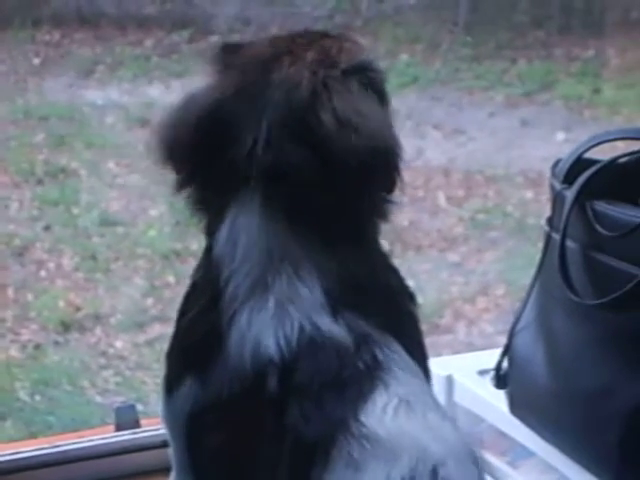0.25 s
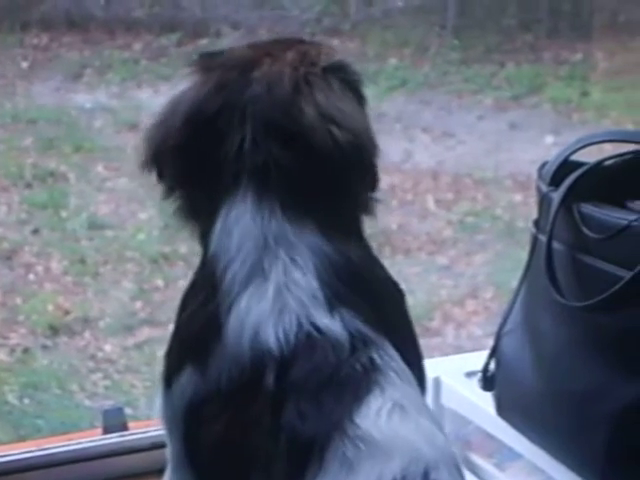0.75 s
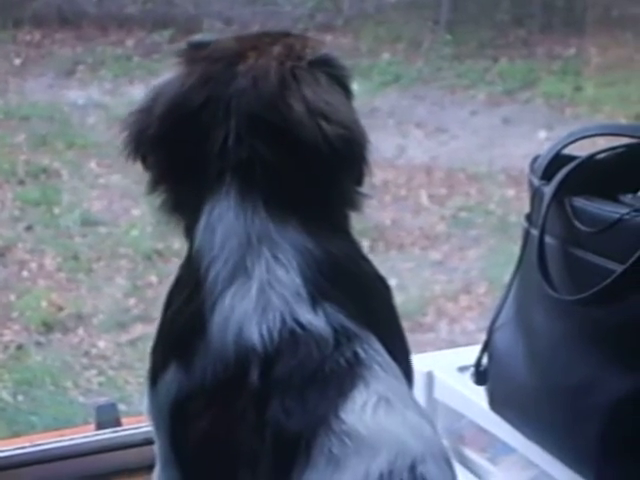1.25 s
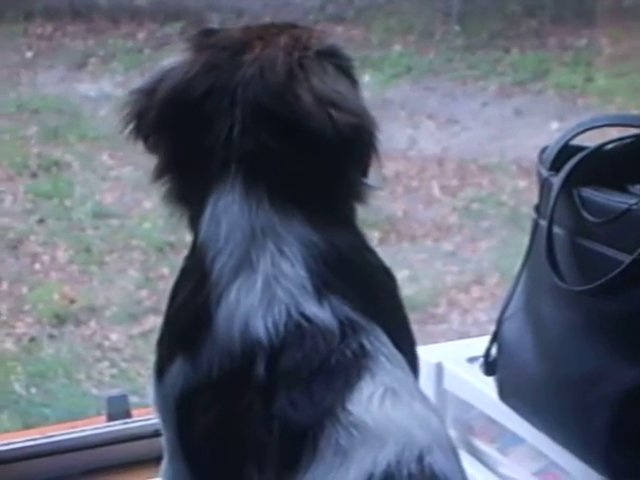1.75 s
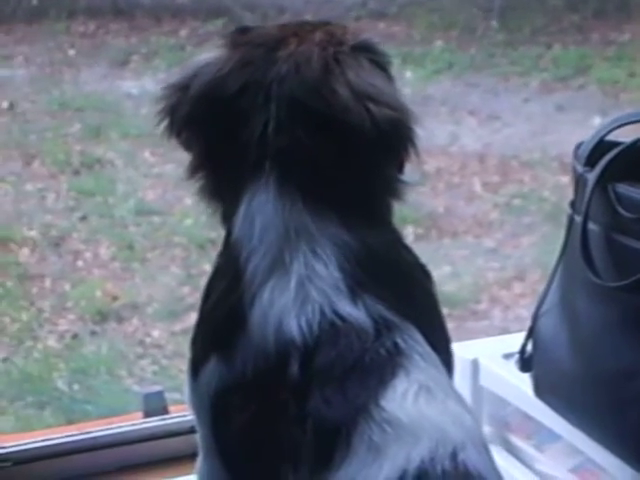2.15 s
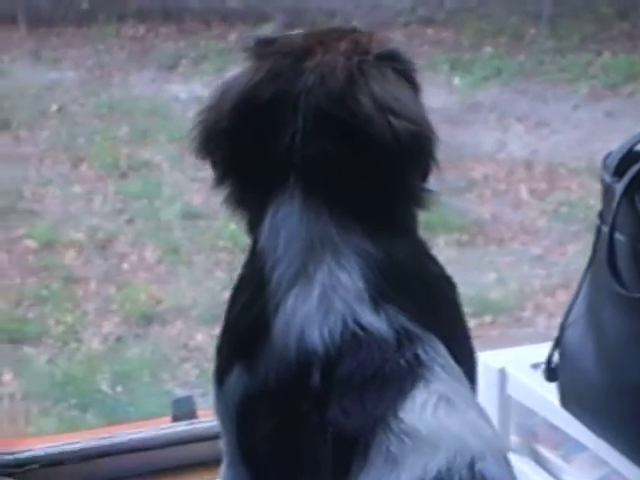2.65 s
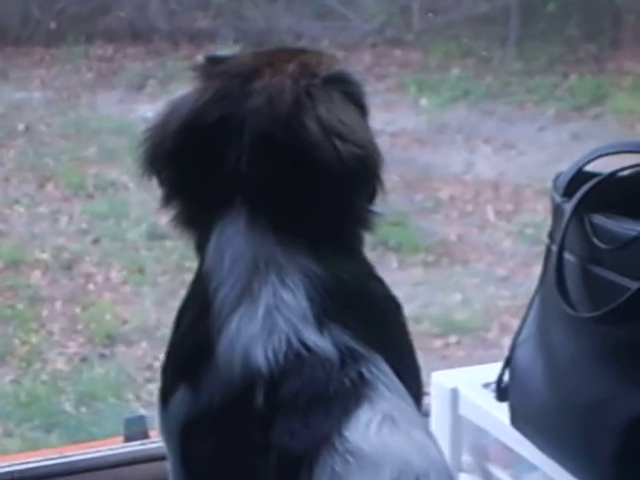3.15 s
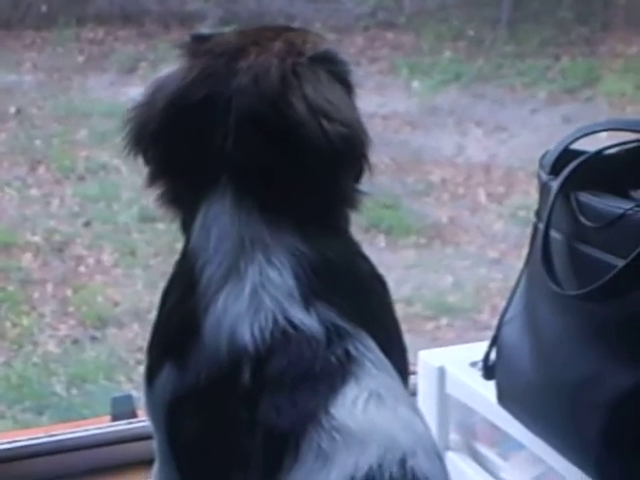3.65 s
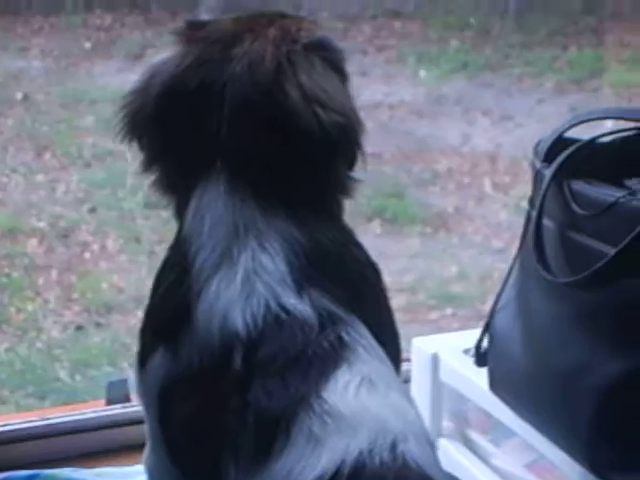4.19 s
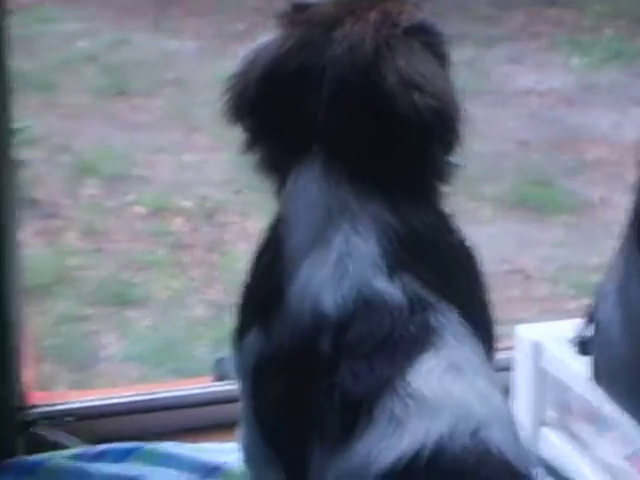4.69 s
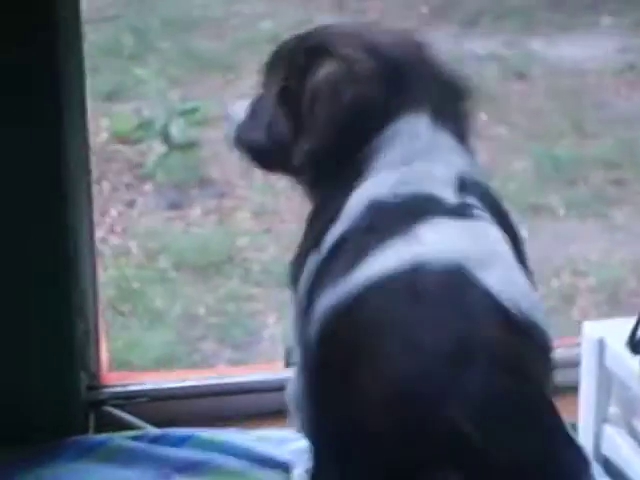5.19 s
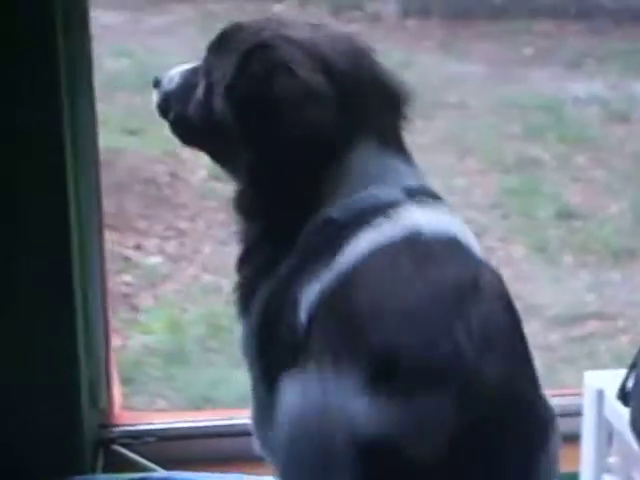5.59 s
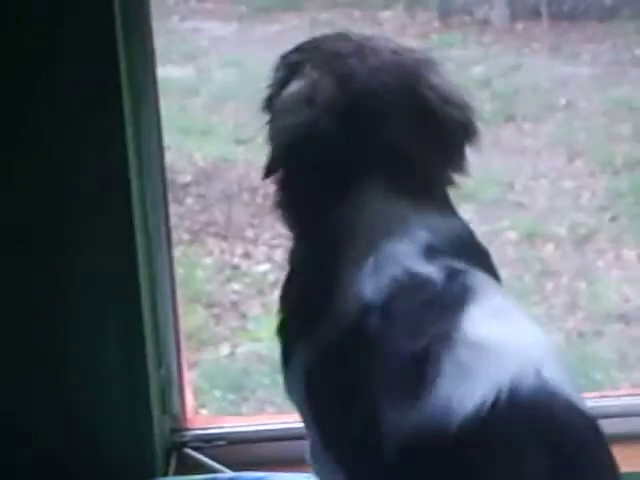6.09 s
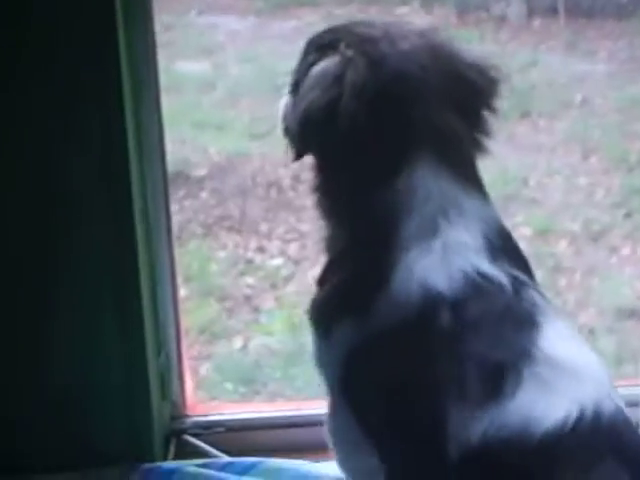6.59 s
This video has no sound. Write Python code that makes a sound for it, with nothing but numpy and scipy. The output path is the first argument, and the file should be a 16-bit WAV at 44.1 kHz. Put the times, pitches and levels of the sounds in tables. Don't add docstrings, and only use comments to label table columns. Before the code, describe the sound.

Close to a camera microphone in a small furnished room, a young dog huffs and gives one loud, high, rough bark. Quiet sniffs, lip smacks and claw ticks follow, with a soft growl ending in a huff. After more quiet, a low fluttering growl swells into a second, lower and clearer bark that decays into a growl, then short huffs. Soft hiss and distant traffic lie underneath.

```python
import sys
import numpy as np
from scipy import signal
from scipy.fft import rfft, irfft
from scipy.io import wavfile

SR = 44100
rng = np.random.default_rng(int(sys.argv[2]) if len(sys.argv) > 2 else 0)


def amplitude_ratio(level_db):
    exponent = np.asarray(level_db, float) / 20
    return 10 ** exponent


def store_wav(level_fs):
    pcm = np.round(np.clip(np.atleast_2d(level_fs), -1, 1) * 32767)
    wavfile.write(sys.argv[1], SR, pcm.T.astype(np.int16))


N = 301400
CONTROL = np.arange(0, N / SR, .002)
CEILING = .72


def evened(x):
    return x / np.sqrt(np.mean(x ** 2) + 1e-20)


def read(points, hz):
    f, value = np.transpose(points)
    return np.interp(np.log(hz + 1), np.log(f + 1), value)


def add(mix, s, sound):
    part = mix[round(s * SR):][:len(sound)]
    part += sound[:len(part)]


def spread(rows):
    s, *columns = np.transpose(rows)
    t = np.arange(s[0], s[-1], 1 / SR)
    return t, [np.interp(t, s, c) for c in columns]


def slow(values):
    return np.interp(np.arange(N) / SR, CONTROL, values)


def peak(t, s, db, rise_db_s, fall_db_s):
    return db - np.where(t < s, rise_db_s * (s - t), fall_db_s * (t - s))


def drift(count, hz):
    noise = rng.standard_normal(count + 4000)
    return evened(signal.lfilter(*signal.butter(2, hz, fs=SR), noise)[4000:])


def coloured(points):
    z = rfft(rng.standard_normal(N))
    return evened(irfft(z * amplitude_ratio(read(points, np.fft.rfftfreq(N, 1 / SR))), N))


def resonate(x, hz, width):
    turn = np.exp(2j * np.pi * np.cumsum(hz * np.ones(len(x))) / SR)
    r = np.exp(-np.pi * 1.5 * width / SR)
    return 2 * (turn * signal.lfilter([(1 - r) ** 2], [1, -2 * r, r * r], x / turn)).real


def tract(drive, modes, jaw=1, wander=0):
    out = np.zeros(len(drive))
    for k, (hz, width, db) in enumerate(modes):
        moving_hz = hz * jaw * (1 + wander * drift(len(drive), 40))
        out += (-1) ** k * amplitude_ratio(db) * resonate(drive, moving_hz, width)
    return evened(out)


def whistle(start, end, from_hz, to_hz, db, waver=.017, throb_db=2.5):
    count = round((end - start) * SR)
    hz = np.linspace(from_hz, to_hz, count) * (1 + waver * drift(count, 200))
    tone = np.sqrt(2) * np.sin(2 * np.pi * (np.cumsum(hz) / SR + rng.random()))
    return start, tone * amplitude_ratio(db + throb_db * drift(count, 70)) * signal.windows.tukey(count, .3)


def call(t, hz, low, high, jaw, voice_db, upper_dbs, throat, clean_db=-90, burst_db=3, throb_db=7):
    low, high = np.clip(low, 0, 1), np.clip(high, 0, 1)
    turns = np.cumsum(hz * (1 + .12 * low * drift(len(t), 150))) / SR
    folds = evened(sum(np.cos(2 * np.pi * k * turns) for k in range(1, 16)))
    folds = folds * amplitude_ratio(4 * low * np.cos(np.pi * turns))
    puffs = evened((0.69 + np.exp(-(turns % 1) / 0.35)) * rng.standard_normal(len(t)))
    low_drive = np.sqrt(1 - low) * folds + np.sqrt(low) * puffs
    high_drive = np.sqrt(1 - high) * folds + np.sqrt(high) * puffs
    out = amplitude_ratio(voice_db + throb_db * low * drift(len(t), 97)) * tract(low_drive, throat[0], jaw, wander=.03)
    out += amplitude_ratio(clean_db) * (1 - low) ** 4 * np.sqrt(2) * np.cos(2 * np.pi * turns)
    for db, modes in zip(upper_dbs, throat[1:]):
        gusts = amplitude_ratio(burst_db * drift(len(t), 80))
        out += amplitude_ratio(db) * gusts * tract(high_drive, modes, wander=.018)
    return t[0], out * signal.windows.tukey(len(t), .04)


def background():
    # frequency in Hz, level in dB per Hz.
    hiss = [(15, -31.5), (25, 0.5), (59, 3), (150, -2.5), (373, -13.5), (573, -14), (655, -14.5),
            (3260, -21.5), (6900, -26.5), (7480, -24), (8100, -30), (10000, -24.5), (12400, -52),
            (15000, -52)]
    # time in seconds, level in dB.
    surges = [(1.0, -60.5), (1.3, -59), (1.6, -58), (2.0, -56.5), (2.6, -66), (3.1, -64)]
    # frequency in Hz, rms level in dB.
    whines = [(7418, -83)]
    t = np.arange(N) / SR
    engine = amplitude_ratio(-71.5) + sum(amplitude_ratio(peak(CONTROL, s, db, 73, 73)) for s, db in surges)
    tyres = amplitude_ratio(-78) + amplitude_ratio(peak(t, 1.6, -65, rise_db_s=5, fall_db_s=11.5))
    drone = evened(resonate(rng.standard_normal(N), 71, 12)) * slow(engine) * amplitude_ratio(-5.0)
    roll = evened(resonate(rng.standard_normal(N), 150, 42)) * tyres
    whine = sum(amplitude_ratio(db) * np.sqrt(2) * np.sin(2 * np.pi * hz * t) for hz, db in whines)
    return amplitude_ratio(-67 + 0.82 * drift(N, 1.9)) * coloured(hiss) + drone + roll + whine


def huff(row, pitch, throat):
    start, voice_s, voice_db, air_s, air_db = row
    start_hz, end_hz, air_rise_db_s = pitch
    t = np.arange(start, air_s + .19, 1 / SR)
    age = t - start
    voice = peak(t, voice_s, voice_db, 0, 150)
    voice = voice - 300 * np.maximum(t - air_s, 0)
    voice = voice - 23 * np.maximum(1 - age / (voice_s - start), 0) ** 1.5
    rise = peak(t, air_s, air_db, air_rise_db_s, 0)
    air_fall_db_s = 310.5
    air = np.minimum(rise, peak(t, air_s + .02, air_db, 0, air_fall_db_s))
    sigh = peak(t, air_s + 0.057, air_db - 5, 170, air_fall_db_s)
    hz = np.interp(age, [0, 0.04], [start_hz, end_hz])
    rough, jaw = 0.33 + 12 * age, 0.93 + 3.5 * age
    return call(t, hz, rough, 0.9606, jaw, voice, [air, sigh], throat, burst_db=1.5, throb_db=5.5)


def huffs():
    # start in seconds, voice peak in seconds, voice in dB, air peak in seconds, air in dB.
    pushes = [
        (.117, 0.124, -39.5, .147, -40),
        (2.336, 2.359, -36, 2.37, -43.5),
        (5.54, 5.596, -47, 5.578, -54.5),
        (5.65, 5.674, -29.5, 5.676, -39.5),
        (6.647, 6.67, -31.5, 6.684, -31.5),
        (6.617, 6.62, -48.5, 6.623, -64),
    ]
    # start pitch in Hz, end pitch in Hz, rise of the air in dB per second.
    pitches = [(189.3, 140, 2403.5), (150, 158, 749.5), (120.6, 460, 501), (144.15, 155, 800.5),
               (197.93, 270, 747.5), (127.3, 210, 751.5)]
    # frequency in Hz,
    # width in Hz, level in dB.
    early_throats = [
        ([(170.04, 120, -6), (380, 140, -12.5), (549.8, 80, 1.5), (800, 250, -8.5), (1110, 230, -11.5)], [(2750, 400, -9), (3340, 450, 0), (4200, 490, 0), (7000, 2900, -16.5)], [(950, 350, 0), (1450, 400, -8), (1950, 300, -1), (2550, 450, -0.5), (2950, 300, -4)]),
        ([(182, 32.3, 5), (279.6, 156.5, 2), (772.5, 135, -4.5), (1224, 235, -10)], [(1780, 510, 6.5), (2600, 517, 12.5), (3727, 590, 9), (4900, 576, 10), (7250, 4100, -6.5)]),
        ([(277, 202, 10), (800, 145, 8.1)], [(1700, 410, -3.5), (2600, 300, -10), (5130, 1100, -16)]),
    ]
    late_throats = [
        ([(145, 300, -16), (255.9, 42.5, 21), (562, 111, 16), (808, 386, 11), (1361, 70, 5.5)], [(1728, 275, 5.5), (2450, 205, 3.5), (3686, 480, 2), (4700, 410, 6), (6170, 3160, -11.5)]),
        ([(139, 33, -4), (321.6, 65.6, 10.5), (900.5, 217, -2.5), (1375, 310, -7)], [(1410, 864, 2), (1946, 120, 0.5), (2600, 974, -6), (4027, 316, -1.5), (4952, 307, -3.5), (6260, 957, -13), (8020, 2860, -21.5)]),
    ]
    # start in seconds, end in seconds, start pitch in Hz, end pitch in Hz, level in dB.
    whistles = [(0.119, 0.14, 565, 544.3, -37.5), (0.139, 0.154, 450, 319.4, -38.5),
                (0.153, 0.193, 750, 800, -44.5), (0.145, 0.146, 4150, 4000, -47.5),
                (.153, .172, 4200, 4160, -45.5), (.154, .19, 3250, 3700, -46.5),
                (2.336, 2.385, 300, 292.8, -43), (2.35, 2.403, 800, 760, -46.5),
                (2.37, 2.422, 3800, 3837, -54.5), (2.375, 2.395, 4850, 4875, -47.5),
                (2.361, 2.399, 2600, 2600, -54), (5.572, 5.584, 1700, 1684, -49.5),
                (5.576, 5.6, 860, 849.2, -51), (5.652, 5.703, 1390, 1403, -41.5),
                (5.655, 5.69, 1730, 1671, -37), (5.657, 5.705, 2465, 2500, -50),
                (5.672, 5.688, 4880, 4860, -52), (5.675, 5.712, 4020, 3563, -48.5),
                (6.661, 6.697, 920, 872.5, -36), (6.653, 6.702, 300, 266.4, -35),
                (6.673, 6.704, 3850, 3785, -43), (6.68, 6.716, 5070, 5030, -43),
                (6.689, 6.726, 1860, 1888, -46.5), (6.693, 6.734, 2930, 2875, -49),
                (6.74, 6.802, 1450, 1535, -55.5)]
    out = np.zeros(N)
    for each in zip(pushes, pitches, early_throats + late_throats + late_throats[-1:]):
        add(out, *huff(*each))
    for row in whistles:
        add(out, *whistle(*row, waver=.04, throb_db=4))
    return out


def room(x):
    # frequency in Hz, time to die by 60 dB in seconds.
    decay = [(100, 0.2), (600, 0.24), (1600, 0.26), (4000, 0.22), (10000, 0.21)]
    taps = np.zeros(SR // 2)
    at = np.arange(150, SR // 2 - 20, 20)
    taps[at + rng.integers(0, 20, len(at))] = rng.choice([-1., 1.], len(at))
    hz, t, z = signal.stft(taps, SR, nperseg=256)
    tail = signal.istft(z * amplitude_ratio(-60 * t / read(decay, hz)[:, None]), SR, nperseg=256)[1]
    return signal.fftconvolve(x, tail / np.linalg.norm(tail))[:N]


def seam_slips(x):
    # time in seconds, peak in dB.
    seams = [(0.1334, -30), (0.3994, -1.5), (0.4364, -11.5), (0.467, -16.5), (1.7344, -47), (2.4353, -33),
             (3.0686, -51.5), (4.2017, -54), (4.4682, -39), (4.6689, -34), (4.7017, -41), (4.9015, -40),
             (5.0004, -1), (5.2026, -25.5), (5.235, -32.5), (5.2687, -23.5), (5.4028, -41.5), (5.7352, -28),
             (6.068, -48.5), (6.7353, -26.5)]
    frame_s, lag_s = 1 / 30, .0025
    slips, step = np.zeros(N), np.exp(-np.arange(200) / (0.000083 * SR))
    for s, db in seams:
        at = round(s / frame_s) * frame_s + lag_s
        add(slips, at, -np.sign(x[round(at * SR)]) * amplitude_ratio(db + 1.5) * step)
    return slips


def bark(rows, colour, throat, whistles):
    # time in seconds, dip in dB.
    breaks = [(.331, -15.5), (.349, -12), (.357, -10.5), (.369, -7), (.385, -8), (4.962, -6),
              (4.968, -19.5), (5.0262, -14.5), (5.0287, -14.5), (5.067, -21)]
    ring_db, top_db, rush_db, pitch_db = colour
    s, db, *rest = rows[-1]
    tail_s, fall_db_s = 0.12, 428.5
    tail = (s + tail_s, db - fall_db_s * tail_s, *rest)
    t, (effort_db, hz, rough, jaw, tongue_db) = spread(rows + [tail])
    catch_db = sum(dip * np.maximum(1 - abs(t - at) / 0.0067, 0) for at, dip in breaks)
    voice_db = effort_db + ring_db * (0.49 - rough) + catch_db
    free_db = effort_db + rush_db - 115 * np.maximum(.82 - jaw, 0)
    top = free_db + top_db + 0.9237 * tongue_db + 32.5 * np.maximum(jaw - 1, 0)
    uppers = [free_db + tongue_db, free_db - tongue_db, top]
    tones = np.zeros(len(t))
    for row in whistles:
        add(tones, row[0] - t[0], whistle(*row)[1])
    air = .45 + .55 * rough
    clean_db = effort_db + catch_db + pitch_db
    start, voice = call(t, hz, rough, air, jaw, voice_db, uppers, throat, clean_db)
    return start, voice + amplitude_ratio(effort_db) * tones


def barks():
    # time in seconds, effort in dB, pitch in Hz, roughness 0-1, jaw factor,
    # tongue in dB toward the mid throat.
    curves = [
        [(.272, -46.5, 289.7, .2, .45, 3), (.287, -38, 330.4, 0.37, 0.654, 7), (.312, -28.5, 499.5, .3, .95, 4),
         (.322, -15.5, 610.7, 0.4, 1.1, -1.5), (.34, -12, 690.2, 0.52, 1.06, -1.5),
         (.378, -12, 707.4, .6, 1.19, -2), (.395, -16, 719.5, .52, 1.17, 4), (.42, -21, 717.1, 0.8, 1.1, 2),
         (.45, -37.5, 715.7, .95, 0.87, 7.5)],
        [(4.918, -47, 329.7, .45, 0.437, 4), (4.94, -36, 392, 0.5, 0.8, 2), (4.961, -18.5, 469.8, 0.6, 1.2, -2),
         (4.972, -15.5, 570.7, .08, 1.2, -1.5), (5.021, -16.5, 598.1, .11, 1.13, 0),
         (5.035, -17, 600, 0.21, 1.11, 4.5), (5.081, -20, 578.9, 0.57, 1, 5),
         (5.085, -28, 546.8, 0.6, .97, 4.5), (5.15, -37.5, 516.8, 0.8, .97, 8)],
    ]
    # ring of a clean voice in dB per unit roughness, top resonances in dB,
    # wide rush of air in dB, bare pitch in dB.
    colours = [(9, -14.5, -3, -3), (10, -14, -4.5, 7)]
    # frequency in Hz, width in Hz, level in dB.
    throats = [
        ([(646.8, 120, 4), (950.2, 520, -15.5)], [(1224, 200, -2), (1600, 260, 1), (1984, 430, -2.5)], [(2280, 45, -4.5), (2524, 110, 3.5), (2800, 75, -2), (3230, 540, -13.5)], [(3757, 260, 0), (4420, 460, -11), (5420, 180, -7.5), (7300, 6600, -20)]),
        ([(600, 180, 1), (820, 200, -10.5)], [(1203.6, 130, -1.5), (1434, 130, 5), (1727, 150, -5.5)], [(2075, 170, 5.5), (2500, 48, -7.5), (2823, 340, -3)], [(3333, 300, 2), (3830, 330, 3), (4340, 370, -5.5), (8950, 7800, -16.5)]),
    ]
    # start in seconds, end in seconds,
    # start pitch in Hz, end pitch in Hz, dB over the effort.
    whistles = [
        [(.3, .34, 2210, 2185, -9), (.314, .345, 2502, 2575, 1.5), (.318, .336, 1700, 1673, -3),
         (.33, .39, 1857, 1865, -9.5), (.342, .358, 2773, 2798, -2.5), (.344, .358, 2471, 2490, 0),
         (.345, .392, 1575, 1553, -6), (.354, .41, 2340, 2304, -6.5), (.362, .383, 2520, 2514, 1),
         (.377, .412, 3690, 3765, -8), (.392, .44, 1604, 1612, -3.5), (.41, .46, 3780, 3870, -11),
         (.438, .5, 1575, 1559, 1.5), (.465, .575, 3800, 3784, -9.5), (.44, .54, 5400, 5400, -18)],
        [(4.954, 4.974, 2100, 2149, -1.5), (4.955, 4.972, 1532, 1589, -10.5), (4.956, 5.058, 3710, 3840, -10),
         (4.959, 4.981, 4720, 4700, -16.5), (4.962, 5.003, 2820, 2886, -7.5), (4.97, 4.996, 1359, 1440, -9.5),
         (4.974, 5.006, 1978, 2038, -1.5), (4.98, 4.997, 2604, 2585, -4), (4.982, 5.105, 857, 870, -11.5),
         (4.997, 5.05, 2407, 2391, -3.5), (4.998, 5.07, 1221, 1222, -4.5), (5.003, 5.033, 1790, 1812, -3.5),
         (5.011, 5.052, 4250, 4271, -14.5), (5.029, 5.046, 1500, 1444, 5), (5.044, 5.086, 1440, 1410, 2),
         (5.03, 5.086, 2000, 1902, -2.5), (5.075, 5.2, 3740, 3882, -7), (5.09, 5.19, 3410, 3540, -8),
         (5.088, 5.16, 1340, 1333, -1), (5.09, 5.165, 2030, 2005, -5)],
    ]
    out = np.zeros(N)
    for each in zip(curves, colours, throats, whistles):
        add(out, *bark(*each))
    return out


def overload(x, top, knee):
    return x / (1 + abs(x / top) ** knee) ** (1 / knee)


def ticks():
    # time in seconds, peak in dB, ring in Hz, time to die by 60 dB in seconds.
    smacks = [(0.793, -50.5, 5850, 0.0283), (0.81, -47, 2180, 0.014), (0.811, -42, 5819, 0.021),
              (1.027, -42.5, 1900, 0.015), (1.256, -57.5, 1780, 0.025), (1.591, -50, 2140, 0.0353),
              (1.899, -52.5, 2920, 0.041), (2.539, -48.5, 591, 0.0325), (2.733, -71, 670, 0.02),
              (2.768, -57, 5200, 0.029), (2.797, -54.5, 3136, 0.025), (3.164, -55, 2329, 0.0196),
              (3.2114, -55, 1840, 0.0197), (3.2345, -52, 3820, 0.0154), (3.238, -43.5, 1930, 0.013),
              (3.414, -62, 2300, .02), (3.447, -53.5, 2349, 0.031), (3.66, -53, 416.7, 0.043),
              (3.86, -52, 2767, 0.023), (5.418, -50.5, 1000, 0.016), (5.441, -53, 4500, 0.012),
              (5.516, -50, 1894, .02), (5.8, -47, 1943, 0.0254), (5.553, -43, 1650, .012),
              (5.566, -43.5, 1700, .012), (5.652, -37.5, 1500, 0.0125), (5.821, -46, 4050, 0.01),
              (5.826, -50, 5794, 0.01), (6.594, -48, 330, 0.033), (6.117, -61.5, 1890, 0.0181),
              (6.232, -49.5, 1260, 0.046), (6.392, -52.5, 3806, 0.034), (6.622, -46.5, 3970, 0.0214),
              (6.622, -38, 353, 0.023), (6.638, -46, 416, 0.024)]
    t, out = np.arange(2500) / SR, np.zeros(N)
    for s, db, hz, t60 in smacks:
        snap = evened(resonate(rng.standard_normal(len(t)), hz, 1.09 * hz)) * amplitude_ratio(-60 * t / 0.0102)
        ring = np.sin(2 * np.pi * hz * t) * amplitude_ratio(-60 * t / max(t60, .003))
        add(out, s, amplitude_ratio(db) * (0.554 * ring + 1.13 * snap) * np.minimum(t / 0.00149, 1))
    return out


def sniffs():
    # peak in seconds, level in dB, centre of the whistle-like band in Hz, fade in seconds.
    puffs = [(0.813, -54, 5680, .08), (.93, -83, 2322, 0.18), (1.027, -55, 2798, 0.16),
             (1.258, -60, 2450, 0.13), (1.598, -68.5, 2190, 0.28), (1.91, -63, 3310, .2),
             (1.99, -60.5, 3271, 0.049), (2.168, -65.5, 2907, 0.0553), (2.23, -74.5, 2550, .1),
             (2.265, -66, 2401, .1), (2.31, -71.5, 2500, .06), (2.5, -70.5, 2600, 0.23),
             (2.77, -74, 3926, .3), (2.87, -86, 2600, 0.17), (3.17, -79, 2336, 0.15),
             (3.24, -62, 3200, 0.061), (3.448, -70.5, 2500, 0.111), (3.77, -73, 2600, 0.079),
             (3.862, -70.5, 2800, .06), (4.028, -67, 3965, .07), (5.41, -66, 2800, .2),
             (5.5, -60, 4807, .3), (5.584, -63.5, 4583, 0.057), (5.8, -63, 2778, 0.14),
             (6.108, -70.5, 3494, 0.345), (6.3, -73, 3122, 0.22), (6.379, -69, 3609, 0.061),
             (6.516, -79, 3402, .1)]
    # frequency in Hz, level in dB per Hz.
    nose = [(240, -2.5), (400, -12.5), (464, -4), (1440, -6.5), (1810, -2.5), (2180, -13), (5910, -7),
            (10000, -26), (13000, -36), (22000, -120)]
    air = coloured(nose)
    level = amplitude_ratio(-91.5)
    pull = level * 2600
    for s, db, hz, fade_s in puffs:
        rise_db_s = 452.5 * max(1, amplitude_ratio(db + 63))
        puff = amplitude_ratio(peak(CONTROL, s, db, rise_db_s, 26 / fade_s))
        level, pull = level + puff, pull + hz * puff
    air = evened(air + .5 * evened(resonate(air, slow(pull / level), 900)))
    return slow(level) * amplitude_ratio(1.2 * drift(N, 43)) * air


def growl(rows, colour, muzzle, beat_hz, uneven, depth, place0):
    # place 0-1, level in dB.
    flaps = [(0, -1), (.3, 0), (.535, -4), (.75, -12)]
    t, (chest_db, jaw) = spread(rows)
    muzzle_db = chest_db + colour[0] + colour[2] * (t - t[0])
    nose_db = chest_db + colour[1]
    turns = place0 + np.cumsum(beat_hz * (1 + 0.12 * uneven * drift(len(t), 30))) / SR
    turns = turns + .08 * uneven * drift(len(t), 50)
    jaw = jaw * (1 + .04 * depth * (turns % 1 - .4))
    size_db = (.8 + 5 * uneven) * drift(len(t), 60)
    slaps = np.zeros(len(t))
    for place, db in flaps:
        hits = np.diff(np.floor(turns - place), prepend=np.floor(place0 - place))
        slaps += amplitude_ratio(depth * db + size_db) * hits
    gate = evened(signal.lfilter([1], [1, -np.exp(-1 / (0.011 * SR))], abs(slaps)))
    rasp = rng.standard_normal((2, len(t))) * [gate, .7 + gate]
    chest = tract(evened(slaps) + .5 * uneven * rasp[0], muzzle[0], jaw, wander=.08 * uneven)
    mouth = tract(evened(slaps) + 3.3 * rasp[0], muzzle[1], wander=.012)
    out = amplitude_ratio(chest_db) * chest + amplitude_ratio(muzzle_db) * mouth + amplitude_ratio(nose_db) * tract(rasp[1], muzzle[2])
    return t[0], out * signal.windows.tukey(len(t), .08)


def growls():
    # time in seconds, effort in dB, jaw factor.
    curves = [
        [(1.8, -67, 1), (1.9, -65, 0.972), (2.1, -57, 0.996), (2.32, -49.5, 0.957), (2.345, -35, 0.89)],
        [(4.17, -73, 0.942), (4.26, -56, 0.993), (4.34, -50, 0.965), (4.5, -48.5, 1), (4.9, -47.5, 0.97),
         (4.93, -37, 0.725)],
        [(5.082, -31, 0.908), (5.1, -28.5, 1.035), (5.165, -36, 1.011), (5.22, -36, 0.975), (5.245, -37.5, .75),
         (5.275, -36.5, .84), (5.31, -37, 1.016), (5.345, -45.5, 1.06), (5.41, -75.5, 0.945)],
    ]
    # muzzle in dB, nose air in dB, muzzle change in dB per second.
    colours = [(-16.5, -32, -9), (-20.5, -22, -0.5), (1.5, -25, -50.5)]
    # flap cycles in Hz, unevenness, depth of grouping, starting place in the cycle.
    beats = [(26, .3, 1.5, -.26), (25.6, .12, 1, -.11), (27, .4, .25, 0)]
    # frequency in Hz, width in Hz, level in dB.
    shut = ([(146, 24, 0), (255, 26, -3), (345, 33, 2), (415, 40, -11), (515, 36, -18), (580, 36, -15),
            (730, 120, -27)], [(880, 150, 0), (1120, 150, -2)], [(2500, 250, 0), (3750, 600, -8),
            (4950, 300, 0), (5700, 600, -6), (7500, 2500, -12)])
    ajar = ([(165, 60, -9.5), (255, 60, -8), (350.9, 37, 4), (460.9, 70.4, -9), (620, 87, -13)],
            [(870, 92, 11.5), (1290, 160, 7.5), (1700, 230, -1.5), (2100, 295, -1.5)], [(3730, 520, 5.5),
            (4430, 287, 11.5), (7090, 4400, -7)])
    out = np.zeros(N)
    for rows, colour, muzzle, beat in zip(curves, colours, [shut, shut, ajar], beats):
        add(out, *growl(rows, colour, muzzle, *beat))
    return out


def birds():
    # start in seconds, end in seconds, start pitch in Hz, end pitch in Hz, level in dB.
    chirps = [
        (3.221, 3.279, 1430, 1362, -72.5),
        (3.327, 3.363, 1410, 1402, -79),
        (3.493, 3.517, 1920, 1897, -72),
    ]
    out = np.zeros(N)
    for row in chirps:
        add(out, *whistle(*row))
    return out


def scene():
    dog = huffs() + barks() + ticks() + sniffs() + growls()
    dog = signal.sosfilt(signal.butter(3, 95, "high", fs=SR, output="sos"), dog)
    return (amplitude_ratio(-1) * dog + amplitude_ratio(-12) * room(dog) + background() + birds())[None]


def roll_off(x):
    return signal.sosfilt(signal.butter(12, 15680, fs=SR, output="sos"), x)


def record(dry):
    x = overload(dry[0], CEILING, 14)
    x = x + seam_slips(x)
    x = signal.oaconvolve(x, signal.firwin(41, 10600, window=("kaiser", 6), fs=SR), "same")
    mix = overload(x, 1.025 * CEILING, 24)[None]
    return roll_off(mix)


dry = scene()
out = record(dry)
store_wav(out)
```